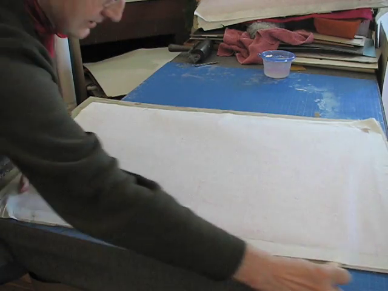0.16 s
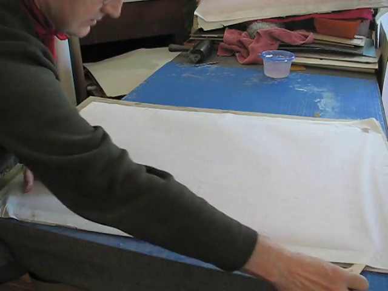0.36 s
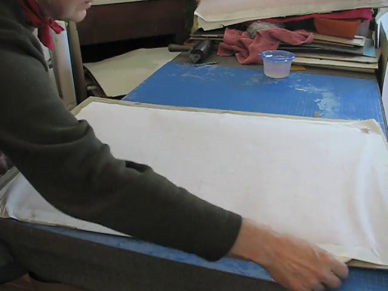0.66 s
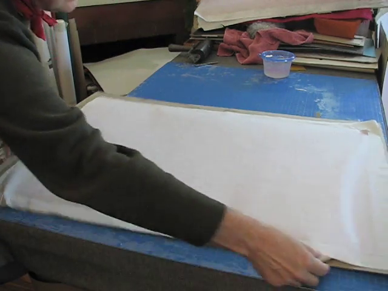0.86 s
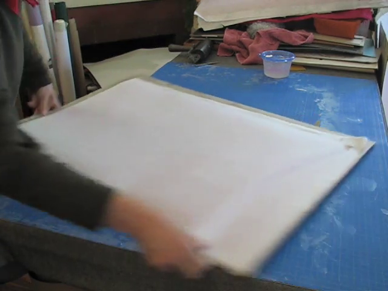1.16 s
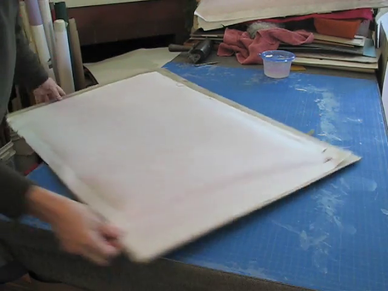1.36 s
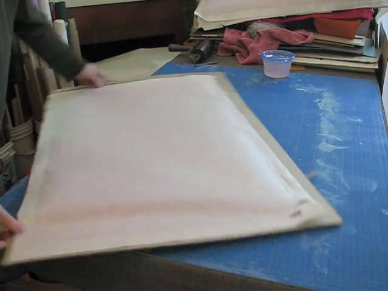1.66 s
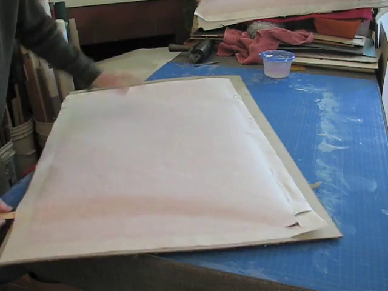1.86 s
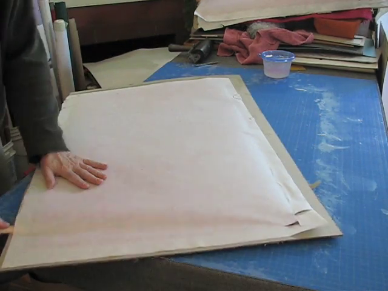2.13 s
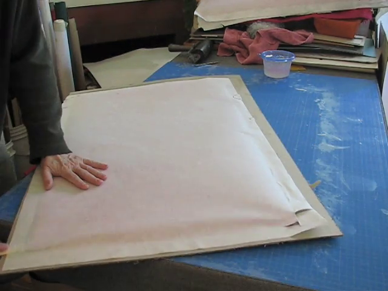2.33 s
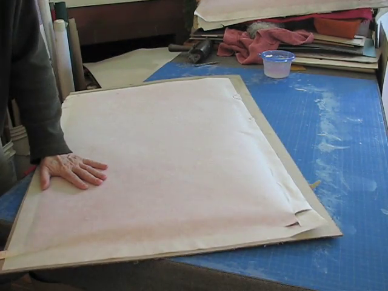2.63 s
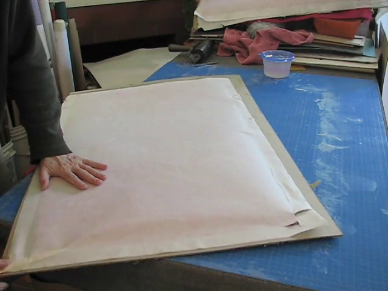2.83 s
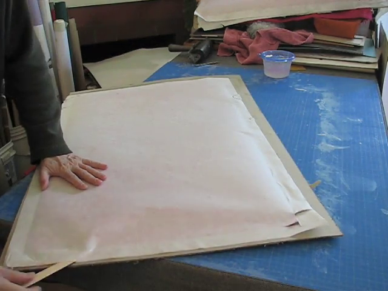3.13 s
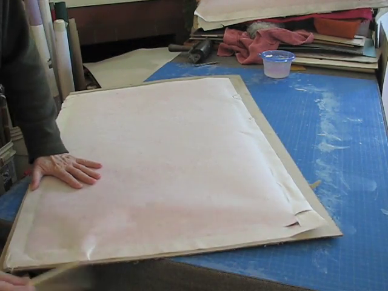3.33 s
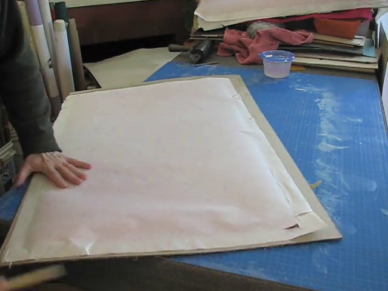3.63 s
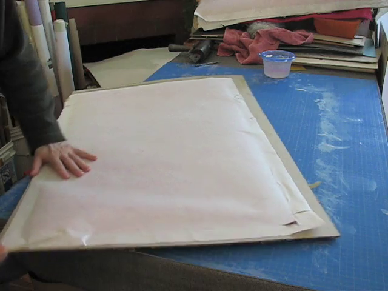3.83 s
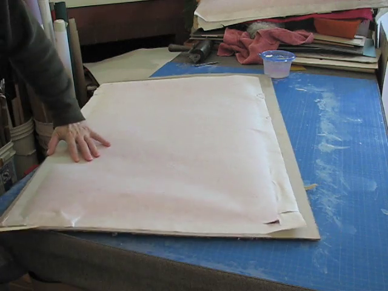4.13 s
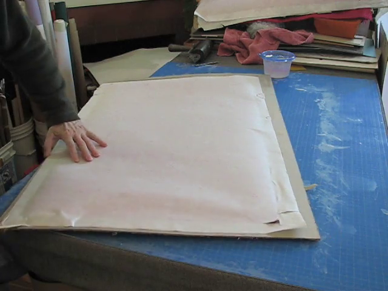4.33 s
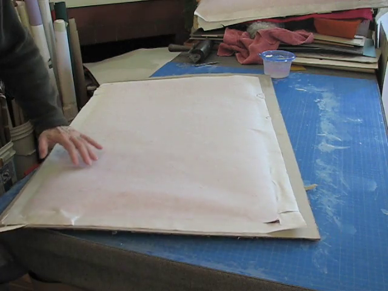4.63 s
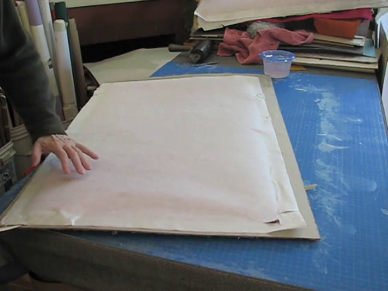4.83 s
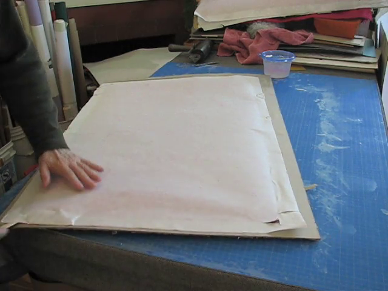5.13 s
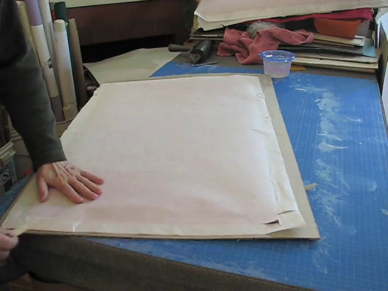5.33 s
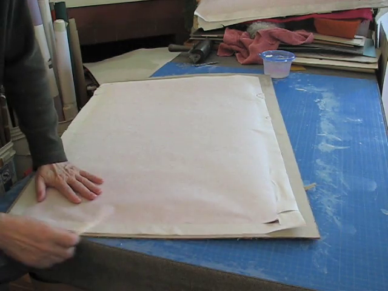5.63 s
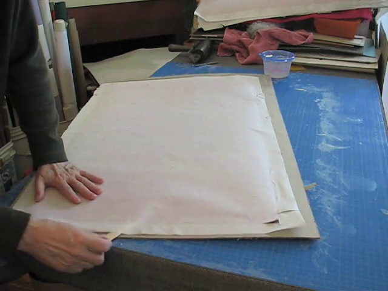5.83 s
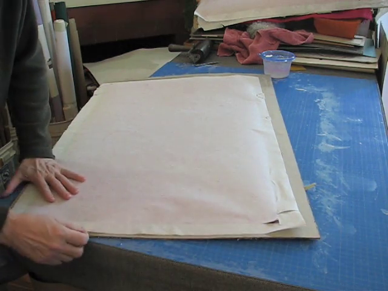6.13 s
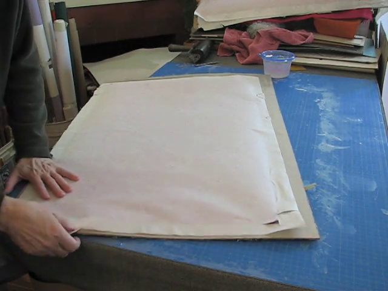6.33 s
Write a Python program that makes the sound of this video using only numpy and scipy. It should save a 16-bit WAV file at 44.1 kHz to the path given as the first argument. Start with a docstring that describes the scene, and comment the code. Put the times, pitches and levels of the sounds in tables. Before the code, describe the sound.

Close up in a small workroom with a faint fan hum, a dry strip peels away in a loud, fizzy rip with snapping threads. The board bumps and scrapes round over a mat, then knocks down. Several short, harsh tears with crackles follow, a soft papery rub, a quiet pause, and a final sharp burst of ripping and snaps.

```python
"""A small, humming room: dried paper-backed silk is ripped off a board on a workbench.
A strip peels away, the board is dragged round over the cutting mat, then the pasted edge cracks
and tears in several pulls; hands brush the paper in between. Friction and tearing are showers of
filtered clicks, threads and board are struck resonances, paste is noise bursts, the fan is steady
noise with tones. The small room echoes the paper and board slides; a gain control ducks the loud rips."""
import sys
import numpy as np
from scipy import signal
from scipy.fft import rfft, irfft, next_fast_len
from scipy.io import wavfile
from scipy.ndimage import uniform_filter1d

SR = 44100
rng = np.random.default_rng(int(sys.argv[2]) if len(sys.argv) > 2 else 0)


def int16_out(signal):
    """Quantize to a 16-bit WAV file."""
    q = np.round(np.clip(np.atleast_2d(signal).T, -1, 1) * 32767)
    wavfile.write(sys.argv[1], SR, q.astype(np.int16))


N = 285751
TIME = np.arange(N) / SR
SIZE = next_fast_len(N + SR // 2, True)
HZ = np.fft.rfftfreq(SIZE, 1 / SR)
EDGE_HZ = 15900  # upper band limit

# colour of paper and board sliding: (frequency [Hz], relative density [dB per Hz])
SLIDE_COLOUR = [(300, -16.5), (800, -7.5), (1550, -0.7), (3300, 0.5), (5500, -0.5), (7400, -1),
                (9500, -19.5), (12200, -17.5), (16000, -35)]
# treble of every snap and crack: (frequency [Hz], gain [dB])
SNAP_TREBLE = [(7900, -0.5), (9400, -14), (12000, -1), (16000, -15)]
# shoves of the board over the mat: (time at full strength [s], rise [s], hold [s], level [dB],
# body re level [dB], fizz re level [dB])
SHOVES = [(.73, 0.036, 0.0055, -43.5, 3, -3.5), (.88, 0.079, 0.039, -35, -4.5, -1),
          (1.005, 0.13, 0.022, -37, 0, -3), (1.14, 0.4, 0.12, -31.5, -11, -11),
          (1.36, 0.9, 0.2, -33, -3.5, -17), (1.58, 0.48, 0.1, -32, -10, -7),
          (1.74, 0.39, 0.0097, -36, 1.5, -15), (2.012, 0.031, 0.11, -50, -3, -14)]


def amp(db):
    """Decibels to gain."""
    return 10 ** (np.asarray(db) / 20)


def evened(x):
    """Scales to rms 1."""
    return x / np.sqrt(np.mean(x ** 2) + 1e-20)


def read(points, hz):
    """Reads a table on a log-frequency axis."""
    f, value = np.transpose(points)
    return np.interp(np.log(hz + 1), np.log(f + 1), value)


def add(mix, s, sound):
    """Mixes a sound in at time s."""
    part = mix[max(round(s * SR), 0):][:len(sound)]
    part += sound[:len(part)]


def coloured(x, gain):
    """Causal filter with the given gain at each of HZ: clicks ring on after they start."""
    log_gain = np.log(np.maximum(gain, 1e-5))
    # folding the cepstrum onto positive time makes the filter minimum-phase
    cepstrum = irfft(log_gain, SIZE)
    cepstrum[1:SIZE // 2] *= 2
    cepstrum[SIZE // 2 + 1:] = 0
    return irfft(rfft(x, SIZE) * np.exp(rfft(cepstrum)), SIZE)[:N]


def wander(rate_hz):
    """Random wobble of rms 1, mostly just below the given rate."""
    ratio = HZ / rate_hz
    spectrum = rfft(rng.standard_normal(SIZE)) * ratio / (1 + ratio ** 3)
    return evened(irfft(spectrum, SIZE)[:N])


def room_tails():
    """Spectra of an echo tail of energy 1 for each port, the treble dying first."""
    # decay of the room: (frequency [Hz], time to fall 60 dB [s])
    room_t60 = [(200, 0.36), (2000, 0.4), (7000, 0.26), (15000, 0.15)]
    hz, t, z = signal.stft(rng.standard_normal((2, SR // 2)), SR, nperseg=256)
    decay = amp(-60 * t / read(room_t60, hz)[:, None])
    tails = signal.istft(z * decay, SR, nperseg=256)[1]
    t = np.arange(tails.shape[1]) / SR
    tails *= 1 + 2.0 * np.exp(-t / 0.0026)  # bench and shelves answer first
    return rfft(tails / np.linalg.norm(tails, axis=1, keepdims=True), SIZE)


def diffuse(pair):
    """Sound from all sides is alike at the two close ports only in the bass."""
    gap_m, sound_speed = 0.05, 343  # [m], [m/s]
    alike = .98 * np.sinc(2 * HZ * gap_m / sound_speed)
    second = alike * pair[0] + np.sqrt(1 - alike ** 2) * pair[1]
    return np.array([pair[0], second]), alike


def placed(x, tails, lead_ms, wet_db, pan_db):
    """Direct sound reaches the left port earlier by lead_ms and the room follows; overall power is evened."""
    # difference between the ports: (frequency [Hz], left minus right [dB])
    port_tilt = [(100, 0.5), (1200, 3), (2000, 1.5), (2800, 0.5), (4400, 4), (6000, 5), (7300, 2.5),
                 (8500, -1), (10000, 6), (12300, 15), (13500, 18), (16000, -9)]
    lead_spread_ms = 0.0082
    side = np.array([[.5], [-.5]])
    # pan_db acts mostly on the treble, which the body shades
    ports = amp(side * (read(port_tilt, HZ) + pan_db * HZ / (HZ + 3000)))
    direct = ports * np.exp(2j * np.pi * side * HZ * lead_ms / 1000)

    # fibres sound from spots all over the wide sheet, and each spot has its own echoes
    knots = np.linspace(0, TIME[-1], num=1100)
    spots = np.array([np.interp(TIME, knots, rng.standard_normal(1100)) for _ in tails])
    spots /= np.linalg.norm(spots, axis=0)
    echoes, alike = diffuse((rfft(x * spots, SIZE)[:, None] * tails).sum(0))

    power = abs(direct.mean(0)) ** 2 + amp(wet_db) ** 2 * ((ports ** 2).mean(0) + alike) / 2
    # fibres across the tear reach the ports with slightly different delays
    scatter = 2j * np.pi * side * HZ * lead_spread_ms / 1000 * rfft(x * wander(400), SIZE)
    both = (rfft(x, SIZE) + scatter) * direct + amp(wet_db) * ports * echoes
    return irfft(both / np.sqrt(power), SIZE)[:, :N]


def effort(strokes, fall_db_per_s, dulling):
    """Body, rasp and fizz gains of strokes that swell, hold and die; dulling scales the loss after the bite."""
    swell_db, swell_curve = 23, 1.14  # a stroke is swell_db down one rise before full strength
    fizz_loss_db, body_loss_db, settle_s = 17.5, 6, 0.06  # losses of a running tear at dulling 1
    t = np.arange(0, TIME[-1], .002)
    power = np.zeros((3, len(t)))
    for s, rise, hold, level_db, body_db, fizz_db in strokes:
        swell = swell_db * (np.maximum(s - t, 0) / rise) ** swell_curve
        fall = fall_db_per_s * np.maximum(t - s - hold, 0)
        db = level_db - swell - fall
        settled = dulling * (1 - np.exp(-np.maximum(t - s, 0) / settle_s))
        body = db + body_db - body_loss_db * settled
        fizz = db + fizz_db - fizz_loss_db * settled
        power += amp([body, db, fizz]) ** 2
    return [np.interp(TIME, t, np.sqrt(band)) for band in power]


def flexed(x, depth_db):
    """As the sheet bends, its resonances rise and sink in random patches of time and frequency."""
    flex_s, flex_width_hz = 0.025, 700  # averaging spans of the patches
    hz, t, z = signal.stft(x, SR)
    patches = uniform_filter1d(rng.standard_normal(z.shape), round(flex_width_hz / hz[1]), axis=0)
    patches = evened(uniform_filter1d(patches, round(flex_s / t[1]), axis=1))
    return signal.istft(z * amp(depth_db * patches), SR)[1][:N]


def crackle(gains, colour, per_s, thinning, spread_db, flex_db):
    """Fibres catch and let go on the bending sheet; each tiny click has its own share of body, rasp and fizz."""
    sizes = amp(spread_db * np.minimum(rng.exponential(1, N), 4))
    # a gentle stroke frees fewer fibres, so single ticks stand out
    pace = np.maximum(gains[1] / gains[1].max(), .02) ** thinning
    signs = rng.choice([-1, 1], N)
    freed = rng.random(N) < pace * per_s / SR
    clicks = sizes * signs * freed / np.sqrt(pace)

    low = 1 / (1 + (HZ / 3000) ** 8)
    high = 1 - 1 / (1 + (HZ / 9000) ** 16)
    out = np.zeros(N)
    for share, gain in zip((low, 1 - low - high, high), gains):
        varied = clicks * amp(1.5 * rng.standard_normal(N))
        grains = coloured(varied, amp(read(colour, HZ)) * np.sqrt(abs(share)))
        out += evened(grains) * gain
    return flexed(out, flex_db)


def bundles():
    """Level jolts of a tear, rms 1: now and then a whole bundle of fibres lets go at once."""
    per_s, biggest, decay_s = 85, 1.9, 0.0009  # biggest jolt is relative to the steady part
    jolts = biggest * rng.uniform(.3, 1, N) * (rng.random(N) < per_s / SR)
    return evened(1 + signal.lfilter([1], [1, -np.exp(-1 / (decay_s * SR))], jolts))


def ring(x, hz, quality):
    """A broad resonance of the taut sheet."""
    b, a = signal.iirpeak(min(hz, 14000), max(quality, hz / 12000), fs=SR)
    return signal.lfilter(b, a, x)


def drone(waver=0.054, fan_db=-43):
    """A distant fan: steady diffuse rumble and hiss with wavering motor tones and a thin whine."""
    # fan noise: (frequency [Hz], relative density [dB per Hz])
    air_colour = [(20, -20), (40, 3), (78, 6.5), (100, -1), (150, 4.5), (480, 0), (680, 0.5), (830, -5.5),
                  (2000, -16), (7900, -18), (9300, -24.5), (16000, -28.5)]
    # steady tones: (frequency [Hz], level re the fan noise [dB])
    hum = [(58.4, -20), (116.8, -14), (411, -18.5), (525, -17), (8280, -25)]
    air, _ = diffuse(rfft(rng.standard_normal((2, SIZE))))
    air = evened(irfft(air * amp(read(air_colour, HZ)), SIZE)[:, :N])
    tones = np.zeros(N)
    for hz, db in hum:
        phase = 2 * np.pi * hz * TIME + waver * wander(3.0)
        tones += amp(db) * np.sqrt(2) * np.sin(phase)
    return (air + tones) * amp(fan_db)


def knocks(rise_s=0.0033):
    """The board bumps the bench: each blow rings its modes, and a corner set per bump decides how far it
    reaches the higher ones."""
    # bumps: (time [s], level [dB], brightness as a corner frequency [Hz])
    bumps = [(0.715, -23, 150), (0.742, -22, 111), (1.738, -29.5, 495), (2.126, -26.5, 453),
             (6.165, -42, 1070), (6.267, -42, 1100)]
    # modes of the board: (frequency [Hz], relative level [dB], time to fall 60 dB [s])
    board = [(114, -13.5, 0.19), (165, -10, 0.13), (232, -3, 0.06), (450, -3, 0.059), (543, -0.5, 0.031),
             (832, -4, 0.081)]
    out, t = np.zeros(N), np.arange(SR // 3) / SR
    for s, level_db, corner_hz in bumps:
        modes = np.zeros(len(t))
        for hz, db, t60 in board:
            tone = amp(db) * 1e-3 ** (t / t60) * np.sin(2 * np.pi * hz * t)
            modes += tone / np.hypot(1, hz / corner_hz)
        add(out, s, amp(level_db) * modes * 2 * (1 - np.exp(-t / rise_s)))
    return out


def brushing_hands():
    """Hand and paper rub on the board: light friction frees a dense shower of small clicks."""
    # rubs: (time at full strength [s], rise [s], hold [s], level [dB], body re level [dB],
    # fizz re level [dB])
    rubs = [(.47, 0.4, 0.0088, -45, -8.5, -3), (3.6, 0.16, 0.15, -44, -8, -9.5),
            (3.78, 0.11, 0.0048, -35.5, -5, -8.5), (3.98, 0.27, 0.07, -29, -7.5, -17),
            (4.26, 0.028, 0.0021, -46.5, -6, -12), (4.39, .07, 0.18, -50, -8, -10),
            (6.15, 0.17, 0.12, -47, -9.5, -8), (6.47, 0.2, .02, -38.5, -4, -11)]
    gains = effort(rubs, fall_db_per_s=170.5, dulling=0)
    return crackle(gains, SLIDE_COLOUR, per_s=12000, thinning=0.15, spread_db=1.0, flex_db=1.1)


def dragged_board():
    """The board slides over the mat in shoves: clicks so dense that they merge into a scrape."""
    gains = effort(SHOVES, fall_db_per_s=163, dulling=0)
    return crackle(gains, SLIDE_COLOUR, per_s=30000, thinning=0.15, spread_db=1.0, flex_db=0.2)


def first_peel():
    """The first strip peels: fibres let go singly and in bundles, with the fizz kept throughout."""
    # peels: (time at full strength [s], rise [s], hold [s], level [dB], sheet body re level [dB],
    # fibre fizz re level [dB])
    strokes = [(0.0, .05, 0.19, -16, -14, -8.5), (0.2, 0.14, 0.043, -12, -12.5, -17)]
    # colour of peeling: (frequency [Hz], relative density [dB per Hz])
    peel_colour = [(400, -22.5), (1500, -11), (3300, -6.5), (7700, -1.5), (9300, -12.5), (12000, -19),
                   (16000, -29)]
    jolts = bundles()
    gains = effort(strokes, fall_db_per_s=194, dulling=0)
    return jolts * crackle(gains, peel_colour, per_s=4500, thinning=0.074, spread_db=1.0, flex_db=1.9)


def cracks(quality=1.03, build=0.22, fade_s=0.0011, low_share=0.36):
    """Patches of dry paste give way in avalanches that build and die quickly; small patches lack body."""
    # patches: (time [s], level before the treble shaping [dB], length [s], centre frequency [Hz])
    patches = [(2.1015, -30, 0.0039, 2070), (2.1214, -17.5, 0.0054, 2430), (2.13, -3, 0.0065, 2620),
               (2.1385, -7.5, 0.0041, 2020), (2.184, -11, 0.0017, 3360), (2.713, -15, 0.039, 2670),
               (3.031, -14, 0.012, 2660), (3.312, -19, 0.0033, 4700), (3.341, -25, 0.012, 2900),
               (5.021, -30, 0.0081, 6800), (5.115, -34, 0.046, 4830), (5.36, -35, 0.0069, 3200),
               (5.479, -26, 0.0052, 2500), (6.1645, -33, 0.0028, 1190), (6.267, -34, 0.0043, 1700)]
    out, t = np.zeros(N), np.arange(SR // 12) / SR
    for s, db, length, hz in patches:
        sheet = signal.butter(2, low_share * hz, "highpass", fs=SR, output="sos")
        burst = ring(rng.standard_normal(len(t)), hz, quality)
        burst = evened(signal.sosfilt(sheet, burst))
        onset = np.minimum(t / (build * length), 1)
        fade = np.exp(-np.maximum(t - length, 0) / fade_s)
        add(out, s, amp(db) * burst * onset * fade)
    return coloured(out, amp(read(SNAP_TREBLE, HZ)))


def snaps(quality=2, splinter=1.0, reach=1.93):
    """A thread breaks with one click that rings a few cycles, and its splinters follow; thick ones are duller."""
    # breaking threads: (time [s], peak before the treble shaping [dB], ringing [Hz], splintering [s])
    threads = [(0.0184, 12, 7450, 0.00014), (0.021, 5, 7450, 0.0018), (0.07, 13, 7900, 0.00027),
               (0.1895, 5, 7000, 0.00062), (0.2072, 4, 6500, .0008), (0.242, 7.5, 6300, 0.00078),
               (0.3125, -3, 6700, 0.00065), (0.379, -10.5, 7000, 0.0012), (0.5405, -22, 6200, 0.0022),
               (2.2467, -0.5, 4750, 0.00044), (2.7258, -1, 2950, 0.0015), (2.758, -0.5, 5100, 0.00064),
               (2.78, -13, 7400, 0.00085), (2.966, -13, 5200, .0007), (3.042, -1, 4200, .001),
               (5.238, -15.5, 4400, 0.0026), (5.247, -14, 4230, 0.00061), (5.268, -18, 5940, .0009),
               (5.304, -26, 4500, 0.0007), (5.3333, -22, 9000, .0009), (5.4965, -8, 4750, 0.0022),
               (5.651, 3.5, 7000, 0.0014), (5.692, 4, 6200, 0.00074), (5.7022, 0, 6360, .0015),
               (5.712, 7, 6260, 0.0015), (5.73, -7, 5540, .0006), (5.7397, 7, 6960, 0.00051),
               (5.7433, 3, 7100, 0.0013), (5.755, -8, 7400, 0.0011), (6.3866, -24, 3280, 0.00028)]
    out, t = np.zeros(N), np.arange(SR // 80) / SR
    for s, db, hz, splinter_s in threads:
        splinters = splinter * rng.standard_normal(len(t)) * np.exp(-t / splinter_s)
        click = ring((t == 0) + splinters, hz, quality)
        b, a = signal.butter(5, min(reach * hz, EDGE_HZ), fs=SR)
        click = signal.lfilter(b, a, click)
        add(out, s, amp(db) * click / abs(click).max())
    return coloured(out, amp(read(SNAP_TREBLE, HZ)))


def edge_rips():
    """Pulls tear the pasted edge: fibres burst singly and in bundles, duller once each tear is running."""
    # pulls: (time at full strength [s], rise [s], hold [s], level [dB], sheet body re level [dB],
    # fibre fizz re level [dB]), body and fizz as at the first bite
    pulls = [(2.15, 0.0092, 0.095, -21, -5, -7), (2.275, 0.11, 0.011, -17, -10, -5.5),
             (2.38, 0.16, 0.059, -31.5, -2, 0), (2.6, 0.17, 0.096, -45.5, -2, -12),
             (2.72, 0.038, 0.074, -18, -3.5, -2.5), (2.96, 0.17, 0.14, -22.5, -7, -7.5),
             (3.035, 0.035, 0.0039, -13, -3.5, -10.5), (3.3, 0.19, 0.0091, -35.5, -13, -4.5),
             (3.32, 0.022, 0.019, -18.5, -2, -5.5), (5.04, 0.13, 0.45, -42.5, -7.5, -10),
             (5.25, 0.099, 0.033, -43, 6, -30), (5.497, 0.032, 0.0054, -20, -5.5, -8),
             (5.61, 0.054, 0.073, -18.5, -7.5, -6.5), (5.69, 0.16, 0.041, -14, -12.5, -21),
             (6.0, 0.21, 0.091, -37.5, -10, -9.5)]
    # colour of tearing: (frequency [Hz], relative density [dB per Hz])
    rip_colour = [(250, -17.5), (1100, -11), (1800, -6), (2800, -4), (4700, 3.5), (7700, 3), (9400, -8),
                  (12400, 8), (16000, -11)]
    jolts = bundles()
    gains = effort(pulls, fall_db_per_s=245.5, dulling=0.55)
    return jolts * crackle(gains, rip_colour, per_s=7000, thinning=0.25, spread_db=2.0, flex_db=1.92)


def scene():
    """The first strip peels nearer the right port, the board is dragged, the rips run nearer the left port."""
    tails = np.array([room_tails() for _ in range(4)])
    threads = snaps()
    early = TIME < SHOVES[0][0]  # threads of the first peel
    mix = drone() + knocks()  # knocks reach both ports alike
    mix += placed(brushing_hands(), tails, lead_ms=0.032, wet_db=-4.0, pan_db=-5.0)
    mix += placed(dragged_board(), tails, lead_ms=-0.026, wet_db=-2.0, pan_db=-6.5)
    mix += placed(first_peel(), tails, lead_ms=-0.035, wet_db=-3.5, pan_db=-9.0)
    mix += placed(cracks(), tails, lead_ms=0.04, wet_db=-2.0, pan_db=-6.0)
    # threads snap at the near edge, so they are drier
    mix += placed(threads * early, tails, lead_ms=-0.062, wet_db=-5.5, pan_db=-12)
    mix += placed(threads * ~early, tails, lead_ms=0.021, wet_db=-8.0, pan_db=-7.0)
    mix += placed(edge_rips(), tails, lead_ms=0.043, wet_db=-2.5, pan_db=-5.0)
    return mix


def record(dry):
    """Gain control ducks loud sound and recovers slowly, remaining peaks clip; then the band limit."""
    threshold_db, squeeze = -20.5, 0.57  # squeeze: dB of ducking per dB above the threshold
    sense_s, recover_db_per_s = 0.0057, 18
    start_duck_db, start_hold_s = 15, 0.32  # the gain starts low and is held there for a moment
    keep = np.exp(-1 / (sense_s * SR))
    power = signal.lfilter([1 - keep], [1, -keep], (dry ** 2).mean(0))
    power_db = 10 * np.log10(power + 1e-12)
    wanted_db = np.maximum(squeeze * (power_db - threshold_db), start_duck_db * (TIME < start_hold_s))
    # a running maximum against a rising ramp: instant ducking, steady recovery
    recovery = recover_db_per_s * TIME
    ducked = dry * amp(recovery - np.maximum.accumulate(wanted_db + recovery))
    band_limit = signal.firwin(511, EDGE_HZ, window=("kaiser", 9), fs=SR)
    return signal.oaconvolve(np.clip(ducked, -1, 1), band_limit[None], "same")


dry = scene()
out = record(dry)
int16_out(out)
```